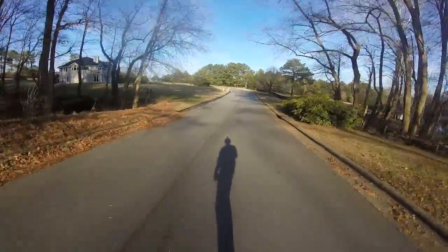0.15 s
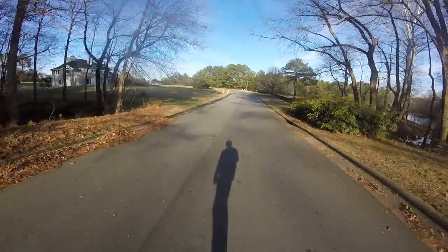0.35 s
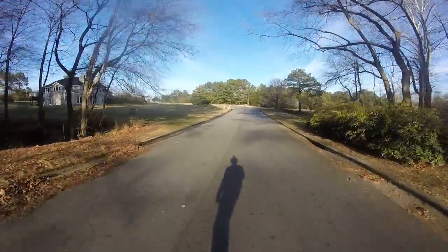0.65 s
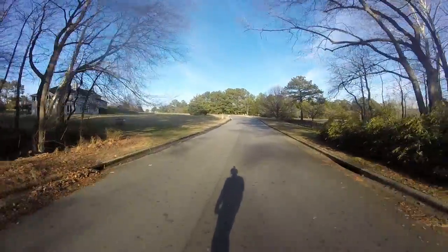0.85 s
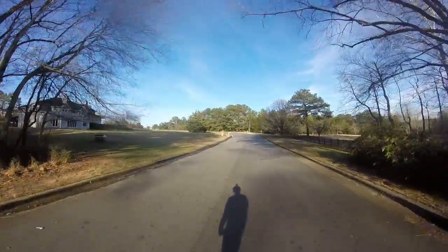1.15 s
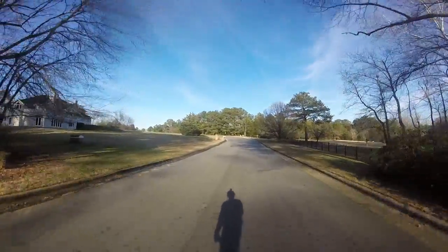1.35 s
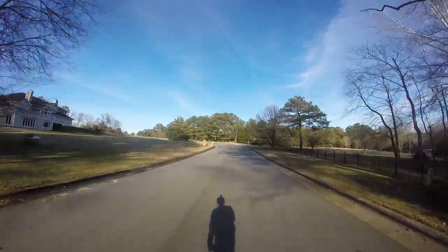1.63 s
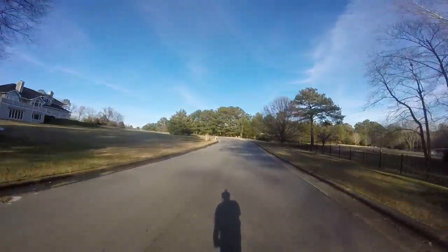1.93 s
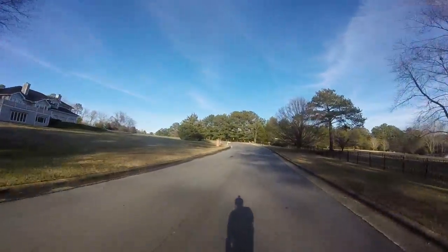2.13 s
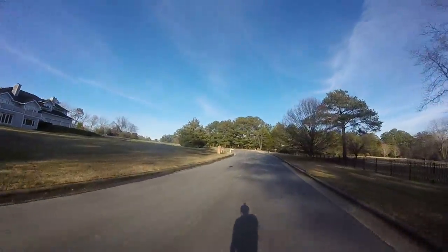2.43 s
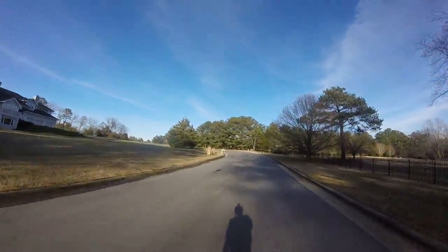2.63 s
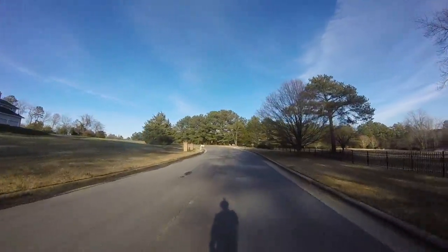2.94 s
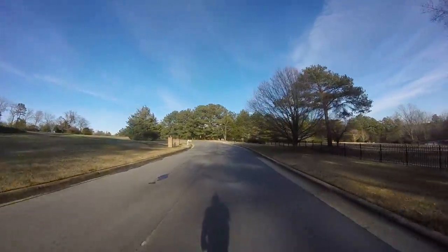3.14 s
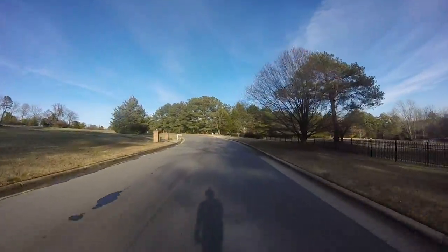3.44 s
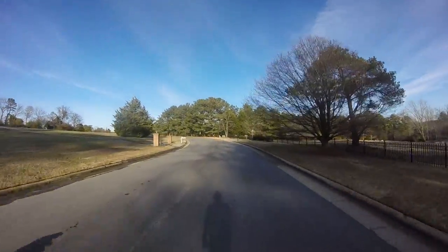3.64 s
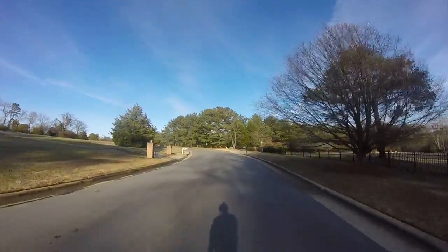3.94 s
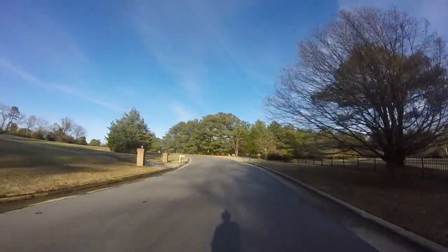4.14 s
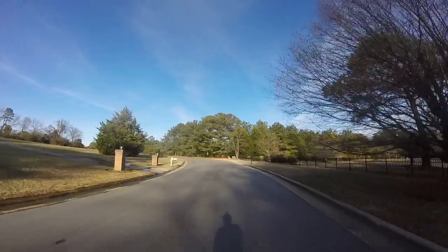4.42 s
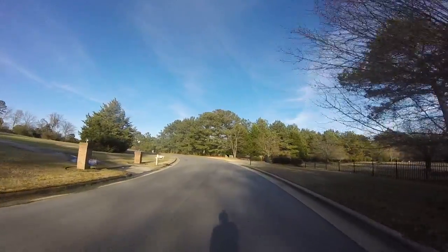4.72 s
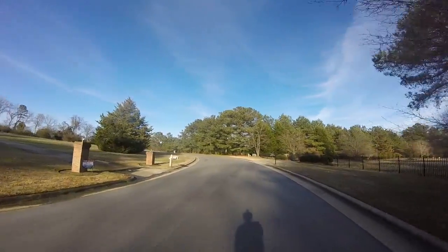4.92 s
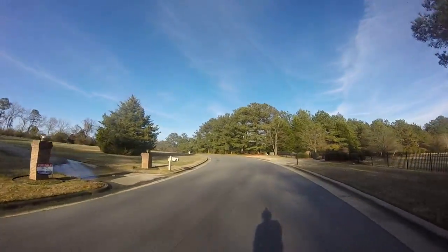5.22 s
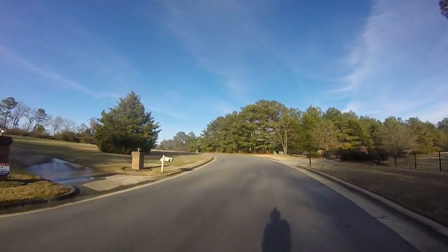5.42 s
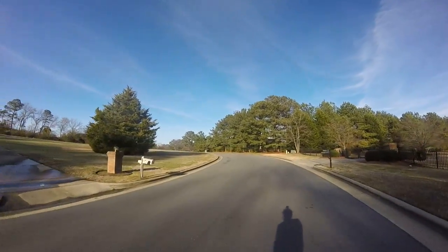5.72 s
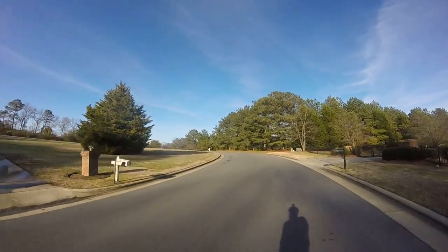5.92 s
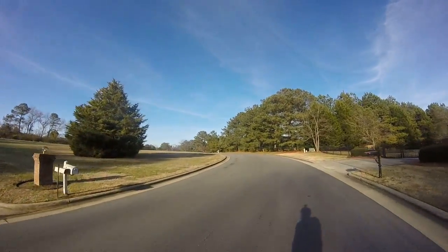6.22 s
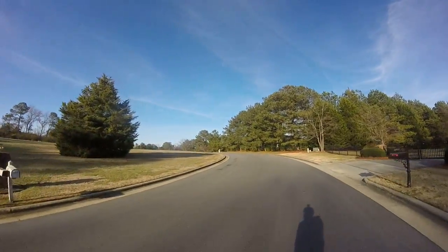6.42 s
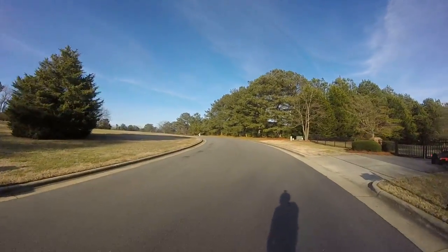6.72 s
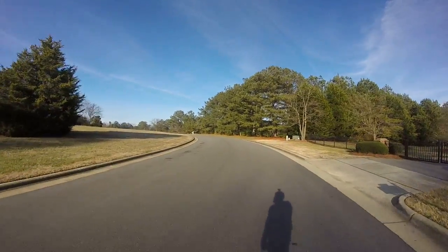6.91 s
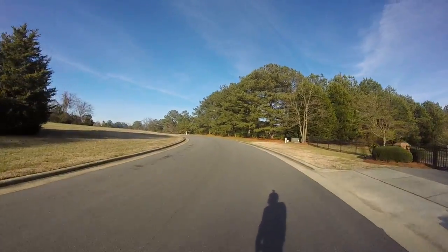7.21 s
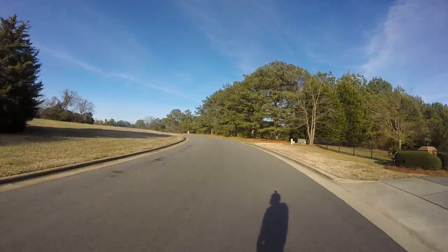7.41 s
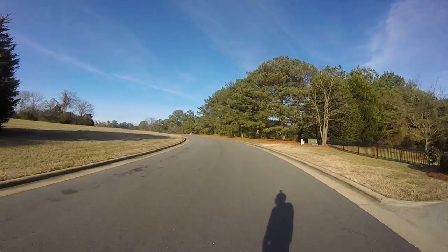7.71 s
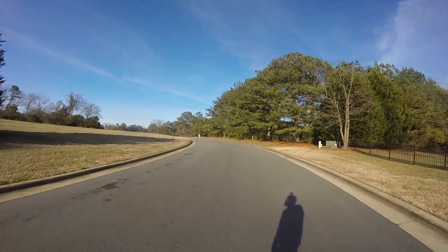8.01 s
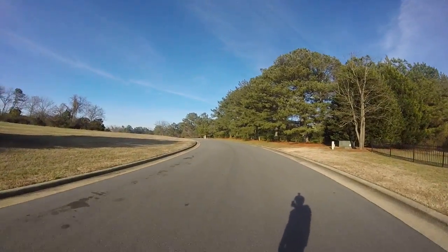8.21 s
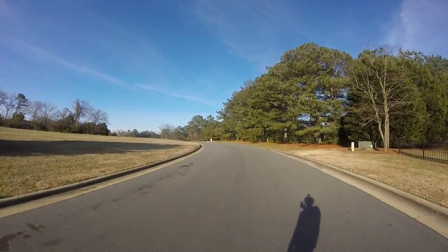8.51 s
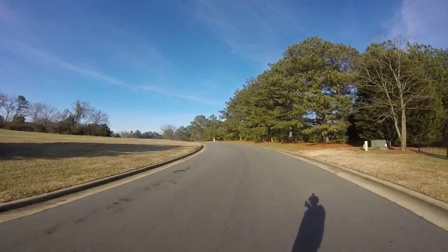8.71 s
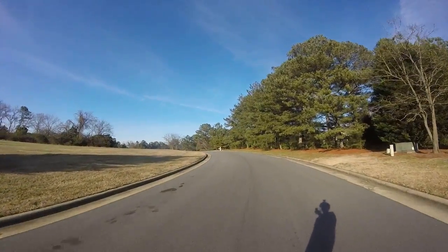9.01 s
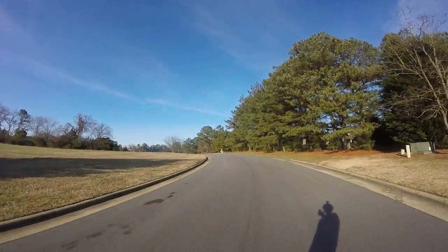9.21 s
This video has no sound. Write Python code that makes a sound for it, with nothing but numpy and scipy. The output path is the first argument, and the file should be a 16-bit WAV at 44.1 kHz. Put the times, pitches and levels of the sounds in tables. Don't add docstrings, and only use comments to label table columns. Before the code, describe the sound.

A longboard rolls on smooth asphalt outdoors, heard from a camera in a closed case riding along. Mid-pitched wheel roar, fine tread hiss and low deck booms mix with strong, fluttering wind whistle and crisp spits of air. The wind drops out briefly before three seconds, blasts back for half a second, then dies. The rolling keeps softening to a faint, dull murmur with a small late puff.

```python
import sys
import numpy as np
from scipy import signal
from scipy.fft import rfft, irfft, next_fast_len
from scipy.io import wavfile
from scipy.ndimage import uniform_filter1d

SR = 44100
rng = np.random.default_rng(int(sys.argv[2]) if len(sys.argv) > 2 else 0)


def gain_from_db(level_db):
    decades = np.asarray(level_db, float) / 20
    return 10 ** decades


def master_out(mix):
    frames = np.transpose(np.atleast_2d(mix))
    ceiling = np.clip(frames, -1, 1)
    pcm = np.round(ceiling * 32767).astype(np.int16)
    wavfile.write(sys.argv[1], SR, pcm)


N = 412335
HZ = np.arange(2 ** 18 + 1) * SR / 2 ** 19 + 1

# t/s, wheel roar level/dB
ROLLING = [(0.0, -35.5), (0.31, -37.5), (0.65, -34.5), (1.48, -37.5), (1.72, -35.5), (2.42, -37),
           (2.97, -38.5), (3.96, -40), (4.37, -42), (4.79, -40.5), (5.23, -45), (5.5, -42.5), (6.3, -47.5),
           (7.2, -49), (7.97, -51.5), (8.46, -55.5), (9.35, -56.5)]


def unit(x):
    return x / np.sqrt(np.mean(x ** 2))


def columns(table):
    s, *rest = np.transpose(table)
    return [np.interp(np.arange(N) / SR, s, c) for c in rest]


def modes(table, order=2):
    power = 0
    for hz, width, db in table:
        detuning = (HZ - hz ** 2 / HZ) / width
        power = power + gain_from_db(2 * db) / (1 + detuning ** 2) ** order
    return np.sqrt(power)


def slope(table):
    hz, db = np.transpose(table)
    return gain_from_db(np.interp(np.log(HZ), np.log(hz), db, left=-70, right=-70))


def ring(force, gain):
    cepstrum = irfft(np.log(gain + 1e-7))
    cepstrum[len(HZ):] = 0
    cepstrum[1:len(HZ) - 1] *= 2
    response = np.exp(rfft(cepstrum))
    sound = irfft(rfft(force, len(cepstrum)) * response)[:N]
    return sound / np.sqrt(np.mean(gain ** 2))


def walk(rate):
    k = int(SR / rate)
    held = np.repeat(rng.standard_normal(N // k + 1), k)[:N]
    return unit(uniform_filter1d(uniform_filter1d(held, k), k))


def grain(scatter_db):
    size_db = scatter_db * np.minimum(rng.exponential(size=N), 4)
    return unit(rng.standard_normal(N) * gain_from_db(size_db))


def steadied(x, share):
    envelope = np.abs(signal.hilbert(x, next_fast_len(N))[:N])
    return unit(x / (envelope + .1) ** share)


def bursts(events, length):
    starts, width = np.zeros(N), length * SR
    for s, db in events:
        starts[int(s * SR + width / 2)] += gain_from_db(db)
    reach = int(2 * width)
    bell = np.exp(-(2 * np.arange(-reach, reach + 1) / width) ** 2)
    return np.abs(signal.oaconvolve(starts, bell, "same"))


def follow(full_db, per_db):
    return full_db + per_db * (columns(ROLLING)[0] + 36)


def gust(share_db, per_db):
    # t/s, strength/dB, sharpness/dB
    headwind = [(0.0, -29.5, -5.5), (0.14, -29.5, -4.5), (0.33, -31.5, -4.5), (0.52, -32.5, -4.5),
                (0.59, -29, -8), (0.65, -34.5, -3), (1.36, -32, -2.5), (1.49, -32.5, -2.5), (1.73, -31, -4),
                (1.85, -33.5, 1), (2.14, -33.5, -2), (2.245, -34, 1.5), (2.295, -39, -3), (2.39, -43.5, -5),
                (2.52, -49.5, -4.5), (2.7, -62, -1), (2.91, -48, -14), (3.11, -50, -9)]
    # t/s, strength/dB, sharpness/dB
    later = [
        [(3.11, -51, -7), (3.16, -44, -4), (3.34, -42.5, -11), (3.4, -39.5, -8), (3.425, -35, -7),
         (3.465, -28, -14), (3.82, -31, -13.5), (3.962, -31.5, -9.5), (4.0, -50, -14)],
        [(4.0, -36, -14), (4.03, -57, -4), (4.12, -44, -10), (4.21, -44, -8), (4.32, -56, -16), (4.5, -88, -10)],
        [(7.2, -90, -11), (7.4, -64, -7), (7.43, -53, -19), (7.61, -43.5, -17), (7.66, -45.5, -18),
         (7.84, -40.5, -19), (7.89, -45.5, -20), (8.0, -48.5, -16), (8.21, -58, -16)],
        [(8.23, -61, -21), (8.41, -54.5, -18), (8.435, -61, -17), (8.455, -56.5, -17), (8.53, -76, -12),
         (8.6, -83, -10)],
    ]
    db, sharp_db = columns(headwind + sum(later, []))
    return gain_from_db(db + share_db + per_db * sharp_db)


def jets(table):
    t = np.arange(N) / SR
    attack_s, release_s = 0.012, 0.027
    flow = np.zeros(N)
    for s, length, db in table:
        onset = np.clip((t - s) / attack_s, 0, 1)
        decay = np.exp(-np.maximum(t - s - length, 0) / release_s)
        flow += gain_from_db(db) * onset * decay
    return flow


def wheels_and_tread():
    # f/Hz, width/Hz, level/dB
    wheel_modes = [(888, 77, -9.5), (990, 65.45, -4.5), (1092.5, 216, -6.5), (1194, 210, -5),
                   (1405, 98, -5.5), (1557.4, 257, 1), (1736.6, 380, 0.5), (2004, 510, -6.5),
                   (2332, 590, -4), (2600, 470, -7), (3300, 340, -14), (3960, 390, -18.5)]
    # f/Hz, level/dB per Hz
    tread_spectrum = [(3500, 10), (4600, -1), (5200, -5), (6300, 4), (7600, 0.5), (8600, -5.5), (9500, -6),
                      (10500, -15.5), (11500, -23), (13000, -26), (15300, -40.5)]
    patch_db = .5 * walk(7.6)

    wheel_gain = modes(wheel_modes, order=1.7) / (1 + (HZ / 7000) ** 4)
    roar_db = columns(ROLLING)[0] + 2.5 + patch_db + 0.39 * walk(25)
    wheels = gain_from_db(roar_db) * ring(grain(1.45), wheel_gain)

    strength = gain_from_db(follow(-62, 1.4)) + gust(-34.5, 1.6)
    texture_db = 7.0 + patch_db + 0.54 * walk(21)
    tread = strength * gain_from_db(texture_db) * ring(grain(1.5), slope(tread_spectrum))
    return wheels + tread


def deck():
    # f/Hz, width/Hz, level/dB
    boom_modes = [(103.2, 17.7, -2), (84.4, 17.2, -6.5)]
    # f/Hz, width/Hz, level/dB
    body_modes = [(151, 91, -9), (205.2, 31.3, -1), (263, 90, -8), (334.75, 47, -3), (406, 204, -10.5),
                  (523, 50, -12), (580.6, 51, -7.5), (713, 111.4, -19.5), (790, 101.46, -21)]
    # t/s, level over the rolling boom/dB
    boom_swells = [(0.03, -3), (0.11, 2), (0.3, 5.5), (0.45, 3), (0.62, 6.5), (0.82, 8), (0.95, 2), (1.12, -2),
                   (1.3, 7), (1.55, 0), (1.74, 1), (1.92, 7.5), (2.15, 5.5), (2.52, -3), (2.77, -6), (2.99, 5.5),
                   (3.36, 2), (3.66, 1), (3.95, 1), (4.6, -15), (4.87, 4.5), (5.04, -16), (5.26, -2), (5.4, -7),
                   (5.51, -2), (5.64, -4), (6.12, -1), (7.68, 1), (7.95, -2), (8.82, 3)]
    swing = 1 + bursts(boom_swells, length=0.085)
    boom = gain_from_db(follow(-39, 0.61)) * swing * steadied(ring(grain(1.5), modes(boom_modes)), share=.5)
    body_db = follow(-41.5, .67) + 0.5 * walk(6)
    body = gain_from_db(body_db) * ring(grain(1.2), modes(body_modes, order=1.4))
    return boom + body


def whistle():
    # f/Hz, width/Hz, level/dB
    slot = [(2693, 374, 0)]
    cavity = [(6247, 420, 1.5), (5870, 300, -9.5), (7783.4, 620, -21), (8200, 638, -29), (9277.5, 700, -31),
              (10267, 430, -26), (11501, 1200, -42.5), (12300, 700, -42), (13000, 500, -36.5)]
    hollows = [(3188, 153, 0.24), (3437, 540, -1.9)]
    rim = [(2110, 310, -12), (3792, 230, 0.5), (4210, 185, -5), (4590, 490, -19), (4890, 271.3, -22.5)]
    lip_tone = [(2540, 490, 0.0045)]
    # share/dB, slope/dB per dB of sharpness
    gust_share = [
        (0, 0),
        (-8, 0.68),
        (-1.5, 0.43),
        (-1.5, 1.36),
    ]
    # t/s, peak level/dB
    puffs = [(2.178, -32), (3.2466, -36), (3.2923, -31), (2.78, -42), (2.93, -38), (3.03, -38), (4.06, -42),
             (4.235, -40), (5.022, -32.5), (5.068, -35), (5.3179, -36), (6.79, -48), (8.8998, -52)]
    puff_share = [
        -4.5,
        -26,
        -13,
        -29,
    ]
    # t/s, hold/s, level/dB
    swirls = [(0.0, 0.092, -45), (1.505, 0.13, -36.5), (2.17, 0.085, -39.5), (3.355, 0.071, -40),
              (3.57, 0.13, -43), (3.75, 0.09, -44), (3.91, 0.029, -38)]

    flutter_db = 0.25 * walk(22.162) + 0.91 * walk(70)
    steady = np.array([gust(*share) * gain_from_db(0.54 * walk(8)) for share in gust_share])
    gusts = steady + gain_from_db(puff_share)[:, None] * bursts(puffs, length=0.014)
    gusts[2] += jets(swirls)
    air = [blow * gain_from_db(flutter_db + 0.3533 * walk(35)) * grain(2.2) for blow in gusts]

    lip_strength = np.minimum(gain_from_db(-2.5) * gusts[0], gain_from_db(-23) * gusts[0] ** 0.5926)
    lip = lip_strength * gain_from_db(flutter_db) * grain(2.2)
    parts = (slot, cavity, hollows, rim, lip_tone)
    return sum(ring(force, modes(part)) for force, part in zip(air + [lip], parts))


def edge_hiss():
    # f/Hz, level/dB per Hz
    hiss_spectrum = [(6500, -18), (8200, -1), (9200, 3.5), (10300, -4), (11500, -8.5), (12800, -9),
                     (14200, -23), (15500, -23)]
    # t/s, hold/s, level/dB
    held_jets = [
        (0.06, 0.22, -69),
        (0.268, 0.47, -59.5),
        (0.8, 0.09, -70),
        (1.79, 0.53, -75),
        (2.005, 0.04, -69),
        (2.19, 0.037, -78),
        (2.268, 0.045, -59.5),
        (3.165, 0.018, -63),
        (5.53, 0.03, -91),
    ]
    # t/s, peak level/dB
    spits = [(0.8606, -61), (0.9656, -62), (1.0205, -63.5), (1.0948, -55), (1.14, -64.5), (1.1606, -54.5),
             (1.1848, -60), (1.2036, -54), (1.2359, -54), (1.26, -65.5), (1.2805, -56.5), (1.2983, -54),
             (1.344, -54.5), (1.3911, -61.5), (1.4098, -56.5), (1.4455, -61.5), (1.4693, -58),
             (1.5571, -60), (1.8009, -56), (1.8486, -55), (1.8743, -58), (1.8905, -57), (1.9317, -54.5),
             (1.9718, -57), (2.0035, -54), (2.1115, -56.5), (2.1341, -57.5), (2.1767, -63), (2.204, -63),
             (2.2712, -58)]
    seep = gust(-38, 2.6)
    flow = (jets(held_jets) + seep) * gain_from_db(3.5 + 0.83 * walk(60))
    spitting = gain_from_db(-.6) * bursts(spits, length=0.01)
    return ring((flow + spitting) * grain(1.5), slope(hiss_spectrum))


def eddies():
    # f/Hz, level/dB per Hz
    thump_spectrum = [(8, -11), (20, 0.5), (35, -2.5), (60, -3.5), (90, -8), (200, -18)]
    level_db = follow(-41, .33) + 0.5 * walk(4)
    return gain_from_db(level_db) * steadied(ring(grain(0.41), slope(thump_spectrum)), share=.3)


def microphone_hiss():
    # f/Hz, level/dB per Hz
    self_spectrum = [(2500, -7), (3500, -6), (5900, -2), (8000, -8), (11000, -12), (12800, -16.5),
                     (13500, -15), (14800, -16), (15300, -23)]
    return gain_from_db(-72.5) * ring(rng.standard_normal(N), slope(self_spectrum))


def scene():
    board = wheels_and_tread() + deck()
    wind = whistle() + edge_hiss() + eddies()
    return (board + wind + microphone_hiss())[None]


def top_cut(x):
    return signal.sosfilt(signal.butter(12, 15210, fs=SR, output="sos"), x)


def record(dry):
    low_pass = signal.ellip(7, .3, 16, 15120, fs=SR, output="sos")
    trimmed = signal.sosfilt(low_pass, dry)
    return top_cut(trimmed)


dry = scene()
out = record(dry)
master_out(out)
```